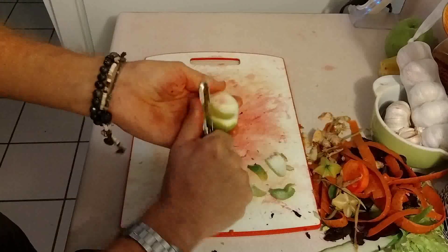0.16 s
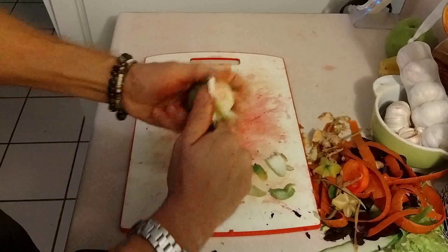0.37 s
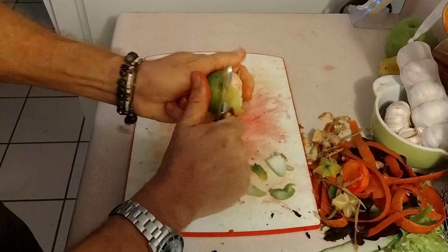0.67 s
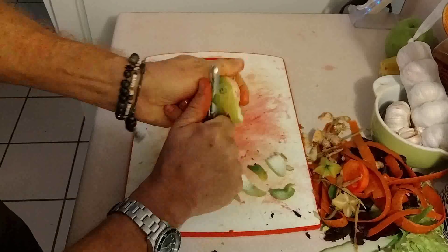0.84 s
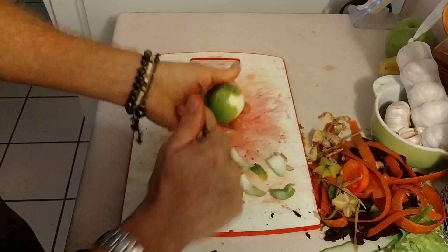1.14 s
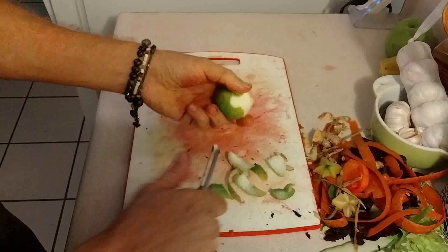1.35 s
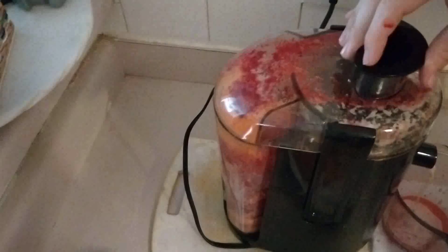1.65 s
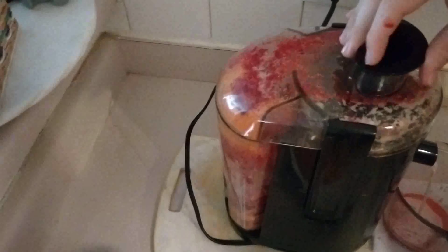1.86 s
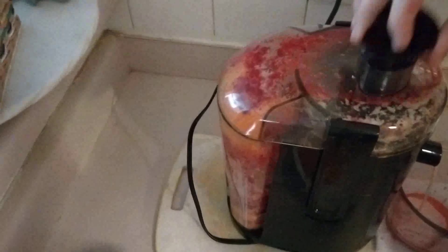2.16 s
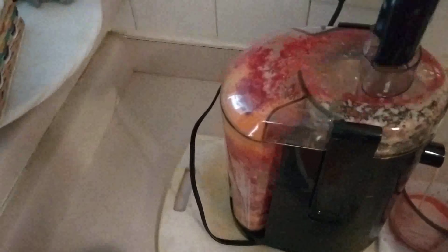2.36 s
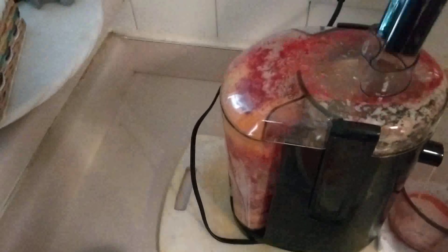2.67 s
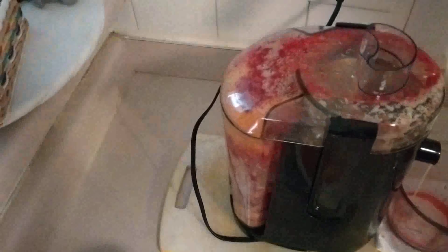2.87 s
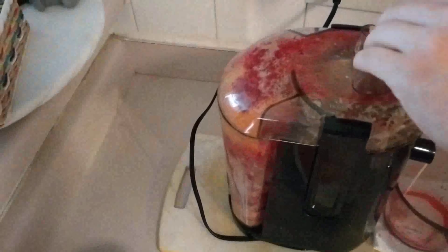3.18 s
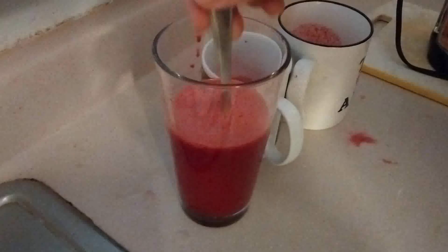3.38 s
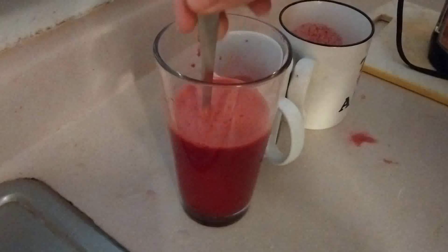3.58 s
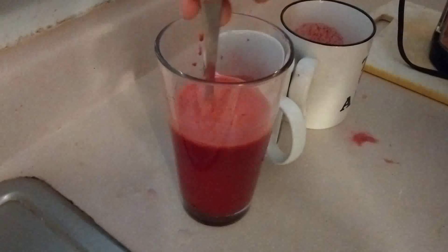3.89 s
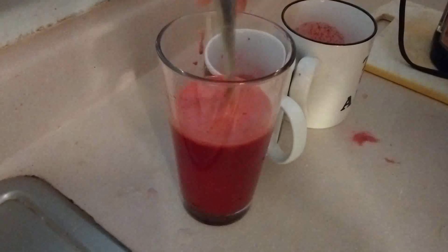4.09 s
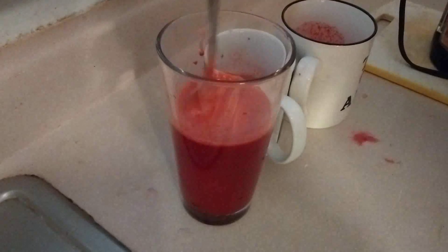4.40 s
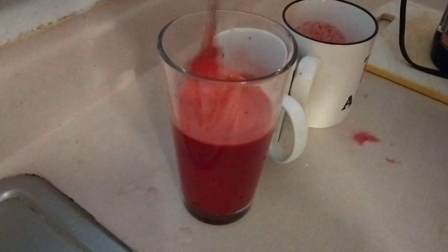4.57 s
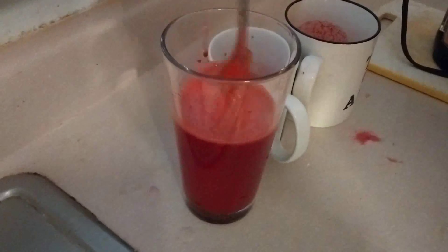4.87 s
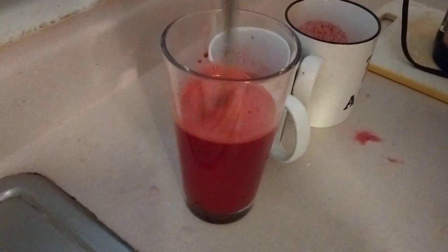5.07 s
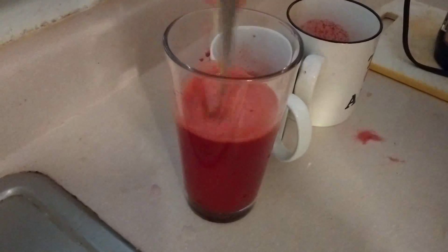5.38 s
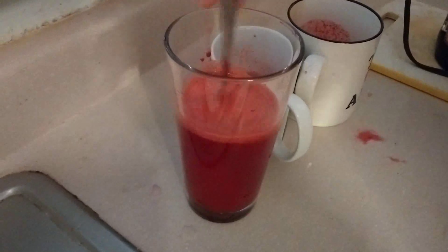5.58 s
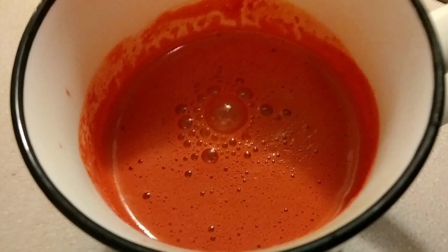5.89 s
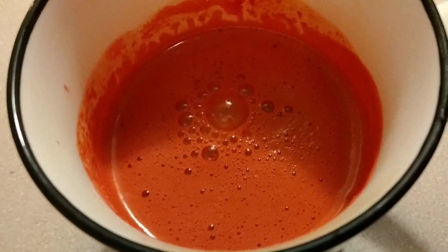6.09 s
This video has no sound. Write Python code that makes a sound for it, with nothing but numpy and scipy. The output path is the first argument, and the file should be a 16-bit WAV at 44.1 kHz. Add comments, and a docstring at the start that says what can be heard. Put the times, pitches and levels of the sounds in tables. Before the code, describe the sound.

A kitchen juicer whines loudly, bogs down, then speeds up close by, cuts off to silence, and a spoon clinks around a glass mug.

```python
"""Juicer, then spoon in a mug

A kitchen juicer bogs down under a load, heard from the cutting board, then picks up speed close by.
Shaft and commutator lines follow a speed curve; shaped noise makes the air, the torn pulp and the rasp.
After an abrupt silence a steel spoon stirs thick juice in a glass mug: contact noise plus decaying modes.
Thuds pass to the worktop, and a dull knock with one bounce ends the stirring.
"""
import sys
import numpy as np
from scipy.fft import rfft, irfft
from scipy.io import wavfile

SR = 44100
rng = np.random.default_rng(int(sys.argv[2]) if len(sys.argv) > 2 else 0)


def inscribe(sig):
    """Save sig as 16-bit PCM at rate SR to the path in sys.argv[1].

    A 1-D sig is mono; a 2-D sig holds one channel per row.
    Samples are clipped to [-1, 1] before scaling.
    """
    pcm = np.round(np.clip(np.atleast_2d(sig).T, -1, 1) * 32767)
    wavfile.write(sys.argv[1], SR, pcm.astype(np.int16))


N = 275360

# Motor under its load, from the board and from close by; levels are relative:
# start_s, shaft_hz, commutator_whine_db, grating_hiss_db
RUN_BOARD = [(0, 211.5, -20, -31), (.36, 212.6, -22, -30), (.44, 210.1, -20.5, -25.5),
             (.68, 210.2, -21.5, -26.5), (.84, 208.4, -17.5, -26), (.97, 204.5, -15.5, -20.5),
             (1.08, 196.8, -31.5, -19.5), (1.3, 170.5, -34, -20.5), (1.484, 156.1, -33.5, -22.5)]
RUN_CLOSE = [(1.484, 196.9, -22, -33.5), (1.9, 206.3, -21, -30.5), (2.3, 211, -19.5, -28),
             (2.62, 214, -16.5, -26.5), (3.03, 215.4, -21, -28.5), (3.16, 213.6, -12.5, -28),
             (3.25, 215, -19.5, -31.5)]
# Motor lines: shaft_multiple, mains_pulse_multiple, board_level_db, close_level_db
MOTOR_LINES = [(0, 1, -37, -44.5), (0, 2, -29.5, -36), (1, 0, -26, -13), (1, 1, -39, -28),
               (2, 0, -34.5, -27), (2, 1, -37, -42), (3, 0, -39, -31.5), (3, 1, -36.5, -45.5),
               (4, 0, -33.5, -31.5), (4, 1, -43, -37.5), (5, 0, -35, -28.5), (5, 1, -38, -36.5),
               (6, 0, -37, -34), (7, 0, -46, -39), (9, 0, -44, -37)]
# Whine of twelve commutator bars: shaft_multiple, mains_pulse_multiple, board_level_db, close_level_db
WHINE_LINES = [(11, 0, -12, -7), (12, -1, -15, -11.5), (12, 0, -0.5, 1.5), (12, 1, -2.5, -8),
               (13, 0, -18, -22.5)]
# Rough bands of the brushes: shaft_multiple, level_db (against the grating hiss)
RASP_BANDS = [(23.5, -11.5), (34.5, -7.5), (46, -11.5)]
# Body and lid boom as a shaft harmonic slides through their resonances: pitch_hz, boost_db
BODY_BOOM = [(155, 6.5), (172, 7.5), (192, -0.5), (201, 0), (216, -1), (308, 3), (324, 16), (385, 20.5),
             (398, 0), (690, 0), (755, 11), (800, -2), (985, -2), (1025, 8.5), (1075, 0.5)]

# Colour of the thrown air, per listening place: pitch_hz, level_db (per Hz)
AIR_BOARD = [(30, -11), (70, 0.5), (130, -2), (230, 4.5), (400, 9.5), (650, 3), (1100, 7.5), (1450, 0.5),
             (2050, 1.5), (2500, 5.5), (2900, -0.5), (4500, -3), (7000, -10.5)]
AIR_CLOSE = [(30, -13.5), (80, -10.5), (130, 6), (210, 10.5), (350, 6.5), (600, 0.5), (1050, 6), (1450, 2),
             (2050, 2), (2500, 6.5), (2950, 0.5), (4500, -6), (7000, -12)]
# Colour of the torn pulp, per listening place: pitch_hz, level_db (per Hz)
HISS_BOARD = [(2000, -26), (4000, -5.5), (6000, -3), (7200, 0.5), (8200, -1), (9400, 5), (11000, -2),
              (13000, -3.5), (15700, -1.5)]
HISS_CLOSE = [(2000, -26.5), (4000, 2), (5200, 3), (6200, 3), (7400, 4), (8200, 1.5), (9500, 6),
              (11300, -5.5), (13500, -3), (15500, 1)]
# Standing waves of the kitchen favour one side: pitch_hz, left_minus_right_db
LEAN_BOARD = [(100, -0.5), (175, -7.5), (195, -1.5), (210, 13.5), (240, -4.5), (320, 14), (400, 10.5),
              (430, 0.5), (620, -5), (770, -4), (1060, 4.5), (1270, -1.5), (2200, 0.5), (2330, -1.5),
              (2500, 0.5), (4000, 0.5)]
LEAN_CLOSE = [(100, -1), (212, 1), (333, 1), (425, 9.5), (540, -5.5), (640, 3), (780, -3.5), (1060, -3.5),
              (1900, -4.5), (2330, -4.5), (2570, 4.5), (4000, -0.5)]
# Treble resonances of the two microphone ports: pitch_hz, left_minus_right_db
PORTS = [(4000, 1), (5200, 4), (7000, 5), (8000, 1), (9300, -13.5), (10300, -7.5), (12500, -3), (15500, 0)]

# Hard bits in the basket: start_s, level_db
CRACKS = [(.41, -15.5), (.5, -35), (1.028, -15), (1.406, -27)]
# Low thumps; the one at 1.478 s marks the switch to the close place: start_s, t60_s, level_db
THUMPS = [(0.396, 0.36, -30.5), (1.17, 0.44, -29.5), (1.478, .07, -17.5), (2.46, .12, -30.5)]
# Short narrow tonal swells near 1 kHz, some on the fifth shaft harmonic: start_s, pitch_hz, level_db
TONAL_SWELLS = [(0.309, 1060, -23), (.385, 1176, -15), (1.02, 1000, -21.5), (2.17, 954, -25.5)]

# Spoon against the mug: start_s, strength_db, knock_db and ring_db (against the strength), ring_length_factor
STIRS = [(3.902, -30.5, 3.5, -12, .9), (3.943, -41.5, 15, -3.5, 1.0), (4.017, -19, 2.5, -19, 0.68),
         (4.079, -22.5, 10, -2.5, 1.0), (4.302, -35, 10.5, -7, 0.56), (4.391, -24.5, 7, -5, 0.47),
         (4.471, -23, 7.5, 1, 1.0), (4.768, -23, -1.5, -1, 0.56), (4.811, -21.5, 1.5, 5.5, 0.92),
         (4.916, -36.5, 2, -4, 1.0), (4.992, -29.5, -8, -8, 0.43), (5.068, -49, -6, -8, 0.61),
         (5.252, -18.5, -7, -2.5, 0.97), (5.334, -28.5, 2, -10, 0.63), (5.545, -21.5, 6.5, -1, 1.0),
         (5.596, -32, 11.5, -11, 1.0), (5.66, -30.5, 10.5, -10, 0.69), (5.722, -40, 9.5, -2, 1.0),
         (5.771, -22.5, 1, -10, 0.49), (5.836, -21.5, 7, -4, 1.0), (5.935, -36, 14, -20, 0.93),
         (5.994, -40, 0, -4.5, 1.0)]
# Modes of spoon and filled mug, shortened blow by blow: pitch_hz, level_db, t60_s
MUG_MODES = [(600, -13, 0.2), (770, -9.5, 0.19), (1056.5, -1.5, 0.18), (1084, -2, 0.19), (1217, 3, 0.068),
             (1319, 0, 0.17), (1412, -2, 0.12), (1544, -15, 0.095), (1836, -5, 0.21), (1930, -2, 0.12),
             (1942, -2, 0.27), (2120, -10.5, 0.058), (3080, -8, 0.1), (3880, -15.5, 0.17),
             (4153, 0.5, 0.038), (4226, 4, 0.15), (4220, -4.5, 0.27), (4720, 6.5, 0.075), (5400, 4, 0.082),
             (5180, -6.5, 0.3), (6200, -5, 0.072), (7305, 3.5, 0.14), (9890, -5.5, .09), (11400, -10, 0.23),
             (11930, -3, 0.19), (14800, 7, 0.11)]
# Edges of the knock, clink, ring, tick and sparkle ranges: pitch_hz
MUG_RANGES_HZ = [0, 1700, 3500, 4600, 8500, 20000]
# Mix of those five ranges: level_db, contact_noise_db (against the modes), snap_db
MUG_MIX = [(-4.5, -7, -15.5), (-4.0, -1.5, -7.5), (-1.5, -7, -12), (-3.5, 6.0, 1.5), (-1.6, 2.5, 5.0)]
# Colour of the contact noise: pitch_hz, level_db (per Hz)
CONTACT = [(400, -13.5), (1050, 2), (1500, 7), (2000, 1.5), (2500, -3), (3100, 1), (3600, -11.5),
           (4400, -1.5), (5300, 5.5), (6800, -5.5), (8600, -12.5), (9900, -2.5), (13500, -6.5),
           (15500, -5.5)]
# Light touches sound thinner than firm blows: strength_db, extra_sparkle_db
SPARKLE = [(-27.5, 3), (-22.5, -2)]

# Modes of the last dull knock: pitch_hz, level_db, t60_s
KNOCK_MODES = [(1060, -13, 0.12), (1080, -32.5, .1), (1180, -23, 0.096), (1280, -25, .09), (581, -29, 0.22),
               (300, -17, 0.12)]
# The knock that ends the stirring, and its bounce: start_s, level_db
KNOCKS = [(5.936, 0.5), (5.993, -9)]
# Colour of the kitchen air: pitch_hz, level_db (per Hz)
ROOM_TONE = [(25, -27.5), (60, -6.5), (120, -1.5), (200, -1.5), (320, -3.5), (600, -13.5), (1000, -19.5),
             (2000, -30), (5000, -37), (15000, -43.5)]

T, FREQS = np.arange(N) / SR, np.fft.rfftfreq(N, 1 / SR)
MIRRORED = np.array([[1], [-1]])  # opposite signs at left and right

# The close place, the silence and the stirring begin; the stirring stops
CLOSE_S, SILENCE_S, STIR_S, REST_S = 1.484, 3.248, 3.889, 6.014
TOP_HZ = 15780
MAINS_PULSE_HZ = 120
HOUSING_HZ, HOUSING_WIDTH_HZ = 2589, 32
OCTAVE_HZ, OCTAVE_WIDTH_HZ, OCTAVE_DB = 5047, 120, -34.5  # a higher resonance of the housing
FREE_HZ, STALL_DB = 214, 16  # shaft rate without load; extra shake of a fully stalled shaft
BITE_S, IDLE_DB = 0.404, 5.5  # upper harmonics ring more clearly until the fruit meets the grater
EASE_S, EASE_DB = 3.06, -3.5  # the unbalance hum drops near the end
CHANGE_S = .05  # time that either change takes
THUMP_HZ, THUMP_WIDTH_HZ = 72, 120
SWELL_WIDTH_HZ, SWELL_T60_S = 100, .35
WORKTOP_HZ, WORKTOP_WIDTH_HZ, WORKTOP_T60_S = 147, 130, 0.16
WORKTOP_DB, WORKTOP_SHARE = -29, 0.25  # thud at 0 dB strength; dB of thud per dB of strength


def undb(db):
    """Decibels to gain."""
    return 10 ** (np.asarray(db) / 20)


def unit(x):
    """Scale to rms 1."""
    return x / np.sqrt(np.mean(x ** 2) + 1e-18)


def at(points, hz):
    """Read (Hz, dB) points on a log-frequency axis."""
    f, db = np.transpose(points)
    return np.interp(np.log(np.maximum(hz, 1)), np.log(f), db)


def sides(db):
    """Left and right gains of equal total power for a level difference."""
    g = undb(np.array([db, -db]).reshape(2, -1) / 2)
    return g / np.sqrt(np.mean(g ** 2, axis=0))


def shape(x, gain):
    """Filter by a gain per frequency."""
    return irfft(rfft(x) * gain, N)


def walk(rate_hz):
    """Smooth random drift of rms 1, slower than about the given rate."""
    return unit(shape(rng.standard_normal(N), 1 / (1 + (FREQS / rate_hz) ** 4)))


def gate(start, end):
    """Open between two times, with 2 ms edges."""
    return np.clip((T - start) / .002, 0, 1) * np.clip((end - T) / .002, 0, 1)


def after(s):
    """Rise from 0 to 1 around time s."""
    return np.clip((T - s) / CHANGE_S + .5, 0, 1)


def fade(t, t60):
    """Exponential decay by 60 dB in t60 seconds."""
    return np.exp(-np.log(1000) * t / t60)


def add(out, s, x):
    """Mix a short stereo sound in at time s."""
    i = int(s * SR)
    out[:, i:i + x.shape[1]] += x[:, :N - i]


def diffuse(gain, alike_hz=900):
    """Coloured noise at two ports: much alike in the bass, unrelated in the treble."""
    mid, side = rng.standard_normal((2, N))
    alike = .9 / (1 + (FREQS / alike_hz) ** 2)
    return shape(mid, gain * np.sqrt(1 + alike)) + shape(side, gain * np.sqrt(1 - alike)) * MIRRORED


def colour(points, lo, hi):
    """Gain per frequency that gives white noise unit power between lo and hi."""
    gain = undb(at(points, FREQS))
    return gain / np.sqrt(np.mean(gain ** 2 * (FREQS > lo) * (FREQS < hi)))


def patchy(depth_db, width_hz):
    """Nearby surfaces leave narrow peaks and dips in a spectrum, different at each port."""
    knots = np.arange(0, SR / 2, width_hz)
    rows = rng.standard_normal((2, len(knots)))
    bumps = np.array([np.interp(FREQS, knots, row) for row in rows])
    return unit(undb(depth_db * bumps))


def thud(hz, width_hz, t60):
    """A narrow-band burst that swells in a few milliseconds and dies away."""
    t = T[:SR // 2]
    band = 1 / (1 + ((FREQS - hz) / (width_hz / 2)) ** 4)
    burst = diffuse(band, alike_hz=2500)[:, :len(t)] * fade(t, t60) * (1 - np.exp(-t / 0.0026))
    # a longer decay carries more energy
    return unit(burst) * np.sqrt(np.mean(fade(t, t60) ** 2))


def ring(modes, t, scatter_db, detune, spread):
    """Decaying modes; every blow lands elsewhere and weighs them anew."""
    out = np.zeros((2, len(t)))
    for hz, db, t60 in modes:
        size, tune, lag = rng.standard_normal(3)
        phase = 2 * np.pi * (hz * (1 + detune * tune) * t + rng.random()) + spread * lag * MIRRORED
        out += np.sin(phase) * undb(db + scatter_db * size) * fade(t, t60)
    return out


def room_tone(db=-46.0, hum_db=-52):
    """A low murmur of air in the kitchen, with a faint mains hum."""
    drift_db = 1.2 * walk(5)
    air = unit(diffuse(undb(at(ROOM_TONE, FREQS)) * patchy(2.4, 30), alike_hz=500))
    hum = np.sin(2 * np.pi * MAINS_PULSE_HZ * T)
    return air * undb(db + drift_db) + hum * undb(hum_db + drift_db)


def worktop(body_hz=255, body_width_hz=230, body_t60=0.2, body_db=-20.5, ring_db=-1.0,
            clack_hz=1170, clack_width_hz=330, clack_t60=0.12, clack_db=-26):
    """Each blow thuds through the foot of the mug; at the end the mug is knocked and bounces once."""
    out, t = np.zeros((2, N)), T[:SR // 2]
    foot = thud(WORKTOP_HZ, WORKTOP_WIDTH_HZ, WORKTOP_T60_S)
    for s, strength_db, *_ in STIRS:
        add(out, s, foot * undb(WORKTOP_DB + WORKTOP_SHARE * strength_db))
    for s, db in KNOCKS:
        tones = ring(KNOCK_MODES, t, scatter_db=-1.0, detune=0.0016, spread=0.42)
        tones *= 1 - np.exp(-t / 0.004)  # soft onset
        body = thud(body_hz, body_width_hz, body_t60) * undb(body_db)
        clack = thud(clack_hz, clack_width_hz, clack_t60) * undb(clack_db)
        add(out, s, (tones * undb(ring_db) + body + clack) * undb(db))
    return out


def spoon(snap_t60=0.014, scrape_db=-9, scrape_t60=0.12, kitchen_t60=0.32, kitchen_db=-19.5, rise_s=0.001):
    """Each blow is a snap, a short scrape and their kitchen echo, plus the modes of spoon and mug."""
    out, t = np.zeros((2, N)), T[:SR // 2]
    early = SR // 50  # levels are matched over the first 20 ms
    for k, (level_db, noise_db, snap_db) in enumerate(MUG_MIX):
        lo, hi = MUG_RANGES_HZ[k:k + 2]
        band = (FREQS >= lo) * (FREQS < hi)
        noise = diffuse(undb(at(CONTACT, FREQS)) * patchy(3.6, 130.1) * band, alike_hz=1510)
        modes = [m for m in MUG_MODES if lo <= m[0] < hi]
        for s, strength_db, knock_db, ring_db, sustain in STIRS:
            sparkle_db = np.interp(strength_db, *np.transpose(SPARKLE))
            colour_db = (knock_db, 0, ring_db, 0, sparkle_db)[k]

            snap = undb(snap_db) * fade(t, snap_t60)
            scrape = undb(scrape_db) * fade(t, scrape_t60 * sustain)
            echo = undb(kitchen_db) * fade(t, kitchen_t60)
            i = rng.integers(N - len(t))  # a fresh stretch of noise for each blow
            contact = noise[:, i:i + len(t)] * (snap + scrape + echo)

            # in a dull blow the spoon stays pressed against the wall and damps the high modes
            free = undb(.22 * min(ring_db - knock_db + 6, 0)) if k >= 2 else 1
            damped = [(hz, db, t60 * sustain * free) for hz, db, t60 in modes]
            tones = ring(damped, t, scatter_db=5.5, detune=0.0017, spread=0.83)

            blow = undb(noise_db) * contact / contact[:, :early].std() + tones / tones[:, :early].std()
            blow = blow / blow[:, :early].std() * (1 - np.exp(-t / rise_s))
            add(out, s, blow * undb(strength_db + colour_db + level_db))
    return shape(out, sides(at(PORTS, FREQS) - .5))


def thumps_swells_cracks(crack_t60=.015):
    """Decaying noise bursts: low thumps, narrow tonal swells, and broadband cracks of hard bits."""
    out, t = np.zeros((2, N)), T[:SR // 2]
    for s, t60, db in THUMPS:
        add(out, s, thud(THUMP_HZ, THUMP_WIDTH_HZ, t60) * undb(db))
    for s, hz, db in TONAL_SWELLS:
        add(out, s, thud(hz, SWELL_WIDTH_HZ, SWELL_T60_S) * undb(db))
    for s, db in CRACKS:
        add(out, s, rng.standard_normal((2, len(t))) * fade(t, crack_t60) * undb(db))
    return out


def juicer(run, lines, whine_lines, air, hiss, lean,
           tone_db, air_db, air_db_per_hz, hiss_db, wobble, flutter_db):
    """Shaft harmonics with mains sidebands, commutator whine through the housing, air and grating pulp."""
    s, *columns = np.transpose(run)
    hz, whine_db, grating_db = (np.interp(T, s, c) for c in columns)
    turns = np.cumsum(hz * (1 + wobble * walk(22))) / SR  # pulp drags unevenly on the basket

    def line(k, m):
        """One motor line; the higher it is, the more its phase differs between the ports, up to a limit."""
        f = k * hz + m * MAINS_PULSE_HZ
        phase = 2 * np.pi * (k * turns + m * MAINS_PULSE_HZ * T + rng.random())
        lag = np.minimum(f / 1500, .65) * MIRRORED
        return np.sqrt(2) * np.sin(phase + lag) * sides(at(lean, f)) * undb(flutter_db * walk(17))

    # the slower the loaded shaft, the harder it shakes the body at its low harmonics
    load_db = STALL_DB * (1 - hz / FREE_HZ)
    idle_db, ease_db = IDLE_DB * (1 - after(BITE_S)), EASE_DB * after(EASE_S)
    shaft = 0
    for k, m, db in lines:
        if m == 0:
            db = db + at(BODY_BOOM, k * hz) + load_db * (k < 5) + idle_db * (k > 2) + ease_db * (k == 1)
        shaft = shaft + line(k, m) * undb(db)

    # whichever line passes the housing resonance takes the lead in the whine
    whine, power = 0, 0
    for k, m, db in whine_lines:
        offset = (k * hz + m * MAINS_PULSE_HZ - HOUSING_HZ) / (HOUSING_WIDTH_HZ / 2)
        # the line below the bar rate has a larger share while idle
        gain = undb(db + idle_db * (k < 12)) * (1 + 2.3 / (1 + offset ** 2))
        whine = whine + gain * line(k, m)
        power = power + gain ** 2
    whine = whine / np.sqrt(power)

    # the octave of the whine is strongest near full speed, where it meets the higher resonance
    order = 24
    octave_offset = (order * hz - OCTAVE_HZ) / (OCTAVE_WIDTH_HZ / 2)
    shaft += line(order, 0) * undb(OCTAVE_DB) / np.hypot(1, octave_offset)

    ports = sides(at(lean, FREQS) + at(PORTS, FREQS)) * patchy(2.5, 45)
    # the faster the basket, the more air it throws
    wind = diffuse(colour(air, 1350, 2100) * ports)
    wind = wind * undb(air_db + air_db_per_hz * (hz - FREE_HZ) + 1.0 * walk(21))

    # the teeth tear the pulp in countless tiny snaps, a little stronger once a turn
    snaps = unit(rng.standard_normal((2, N)) * undb(2.1 * rng.exponential(size=N)))
    once_a_turn_db = .5 * np.sin(2 * np.pi * turns)
    spray = shape(snaps, colour(hiss, 8000, 15500) * ports)
    spray = spray * undb(grating_db + hiss_db + 1.1 * walk(37) + once_a_turn_db)

    # the brushes rasp in rough bands that fall and fade with the speed
    rasp = 0
    for k, db in RASP_BANDS:
        carrier = np.sin(2 * np.pi * k * turns + rng.uniform(0, 2 * np.pi, (2, 1)))
        rasp = rasp + walk(220) * carrier * sides(at(PORTS, k * hz)) * undb(db)
    rasp = rasp * undb(grating_db - 2 * load_db)
    return undb(tone_db) * shaft + whine * undb(whine_db - 2.5) + wind + spray + rasp


def scene():
    """The juicer from two places, a silence, then the stirring."""
    lines, bars = np.array(MOTOR_LINES), np.array(WHINE_LINES)
    board = juicer(RUN_BOARD, lines[:, [0, 1, 2]], bars[:, [0, 1, 2]], AIR_BOARD, HISS_BOARD, LEAN_BOARD,
                   tone_db=-2.07, air_db=-35.0, air_db_per_hz=0.04, hiss_db=-3.0,
                   wobble=.002, flutter_db=3.0)
    close = juicer(RUN_CLOSE, lines[:, [0, 1, 3]], bars[:, [0, 1, 3]], AIR_CLOSE, HISS_CLOSE, LEAN_CLOSE,
                   tone_db=-0.5, air_db=-31.0, air_db_per_hz=0.12, hiss_db=-1.4,
                   wobble=0.001, flutter_db=1.1)
    motor = board * gate(0, CLOSE_S) + close * gate(CLOSE_S, SILENCE_S) + thumps_swells_cracks()
    stirring = (spoon() + worktop()) * gate(STIR_S, REST_S)
    return motor + stirring + room_tone() * gate(STIR_S, N / SR)


def record(dry):
    """The recorder cuts the top steeply."""
    return shape(dry, 1 / np.sqrt(1 + (FREQS / TOP_HZ) ** 300))


dry = scene()
out = record(dry)
inscribe(out)
```